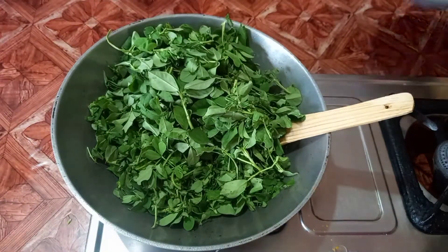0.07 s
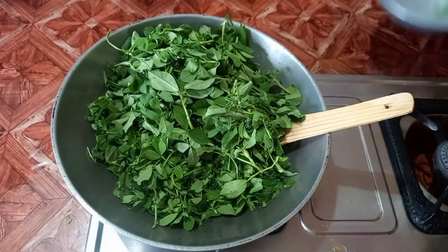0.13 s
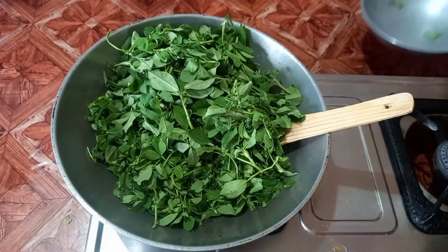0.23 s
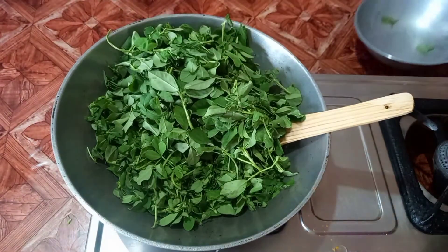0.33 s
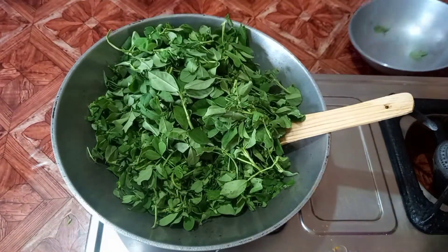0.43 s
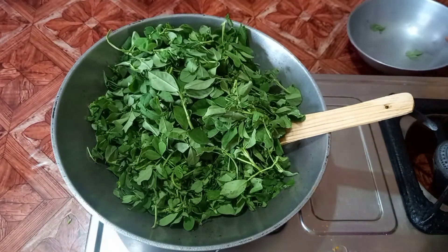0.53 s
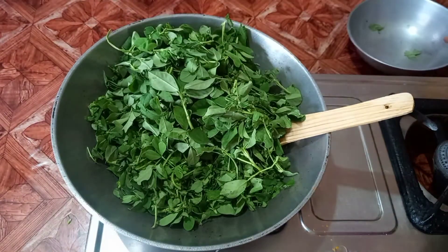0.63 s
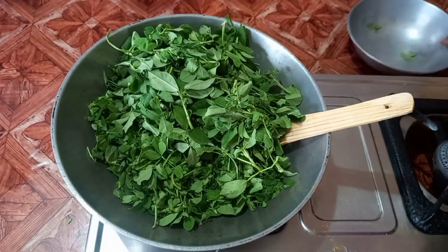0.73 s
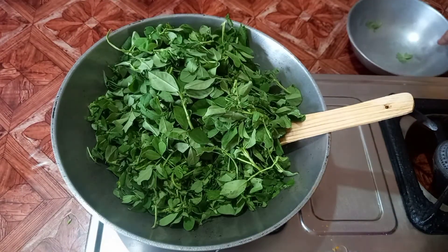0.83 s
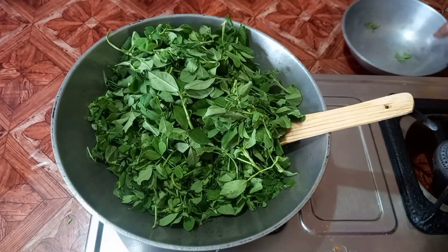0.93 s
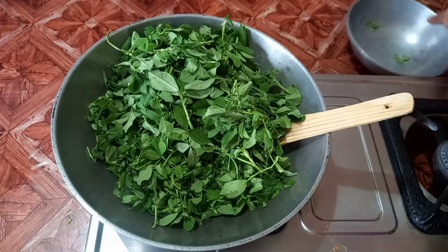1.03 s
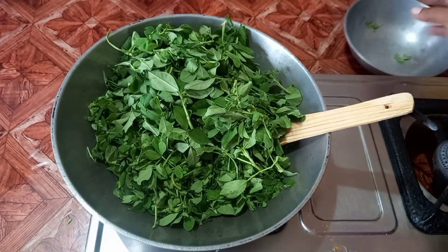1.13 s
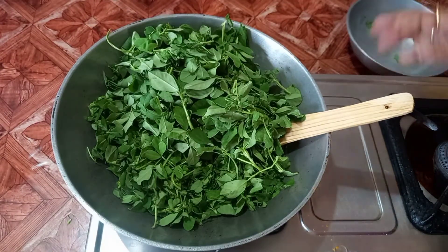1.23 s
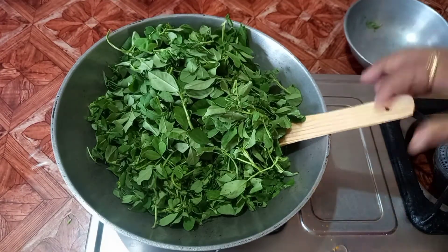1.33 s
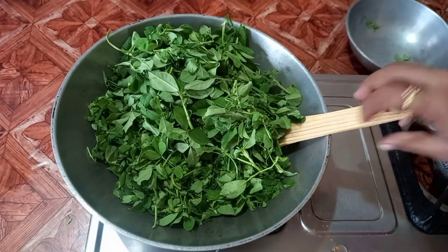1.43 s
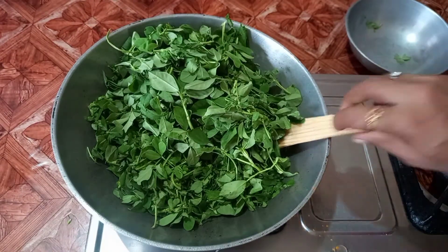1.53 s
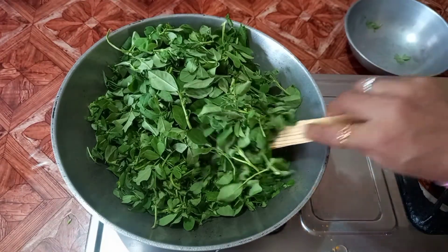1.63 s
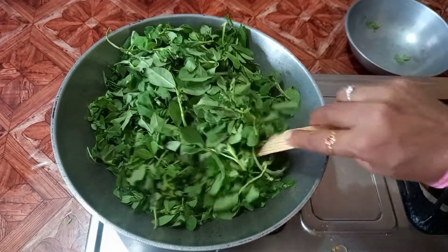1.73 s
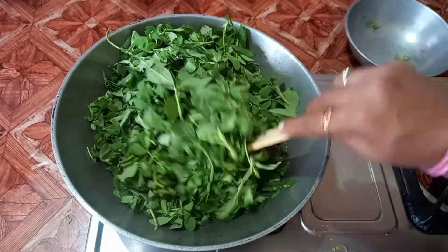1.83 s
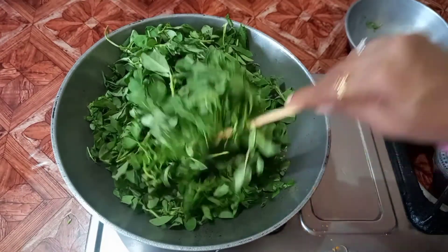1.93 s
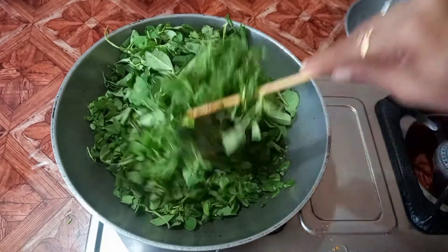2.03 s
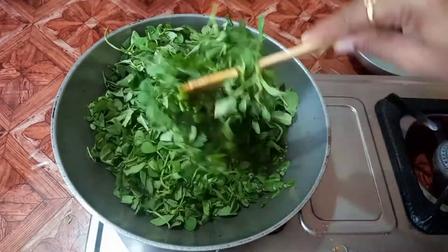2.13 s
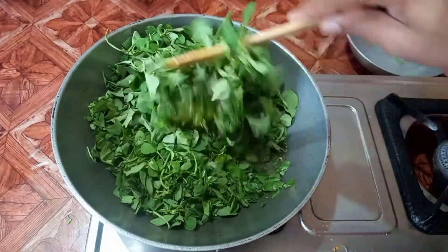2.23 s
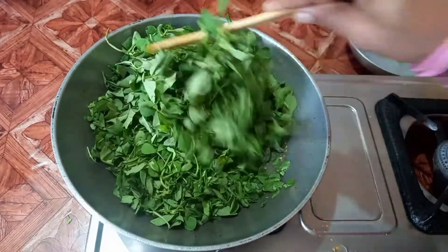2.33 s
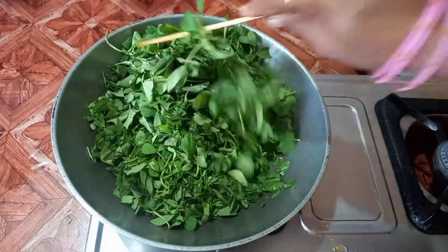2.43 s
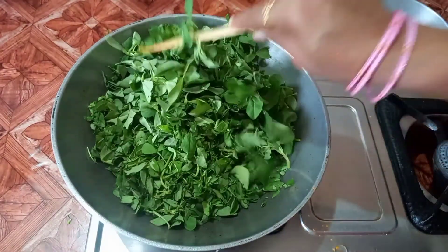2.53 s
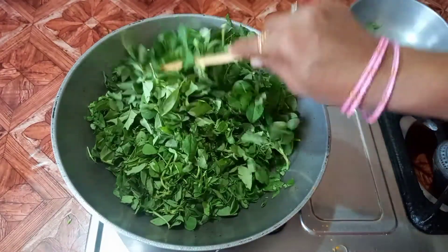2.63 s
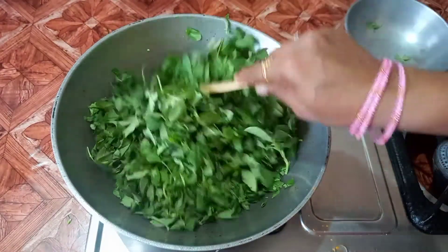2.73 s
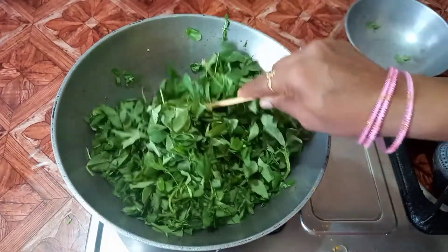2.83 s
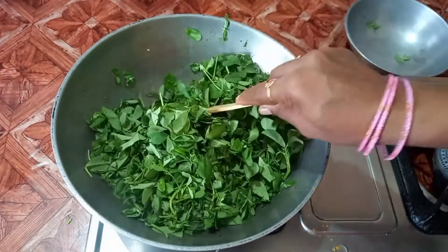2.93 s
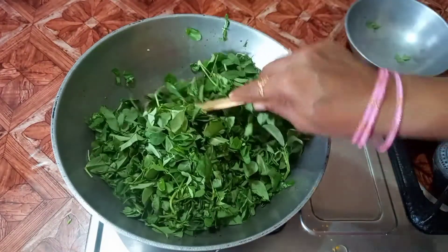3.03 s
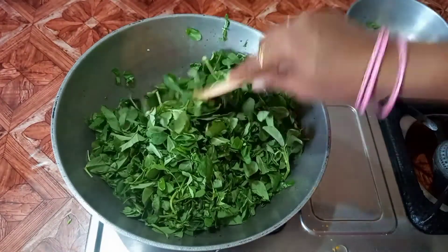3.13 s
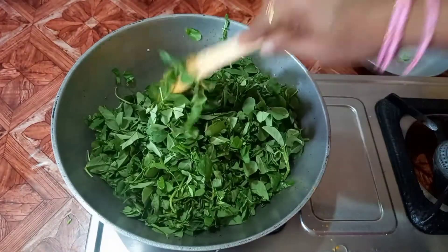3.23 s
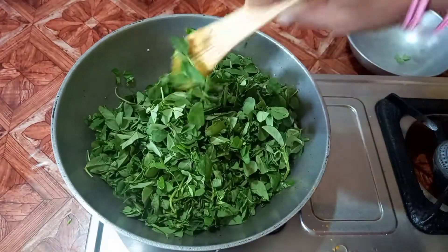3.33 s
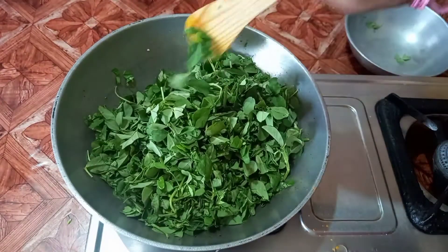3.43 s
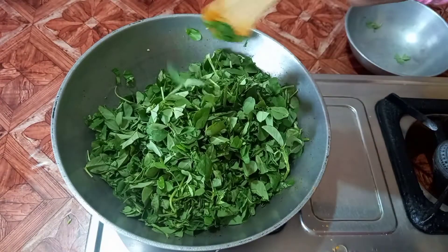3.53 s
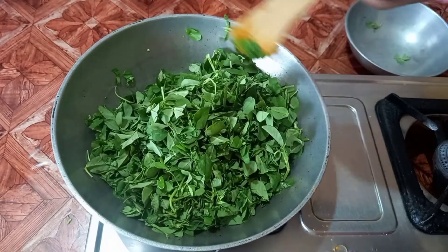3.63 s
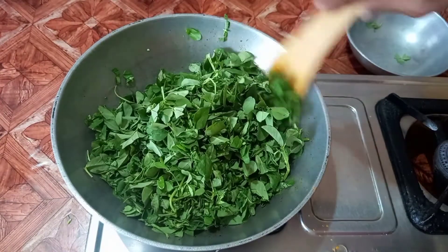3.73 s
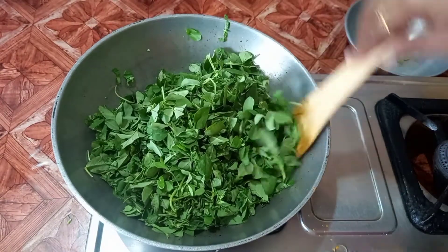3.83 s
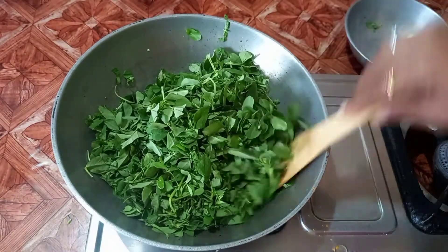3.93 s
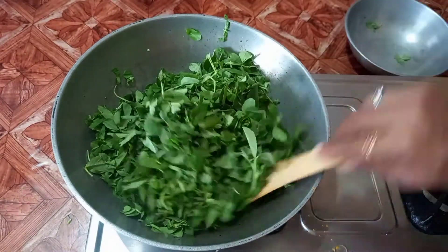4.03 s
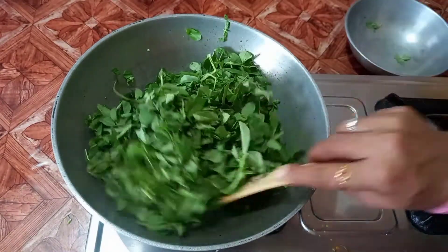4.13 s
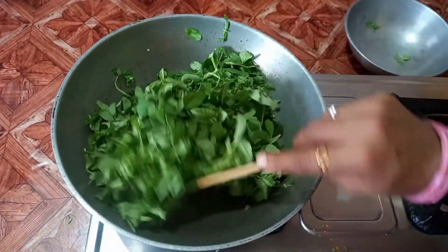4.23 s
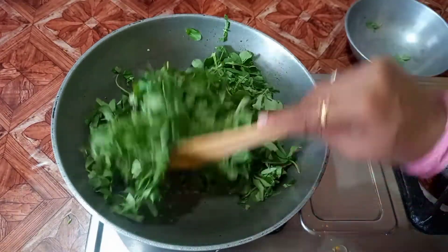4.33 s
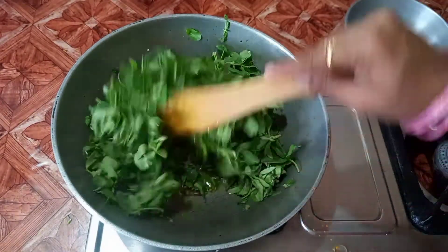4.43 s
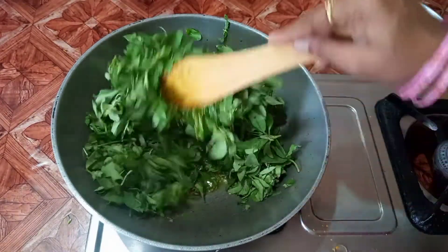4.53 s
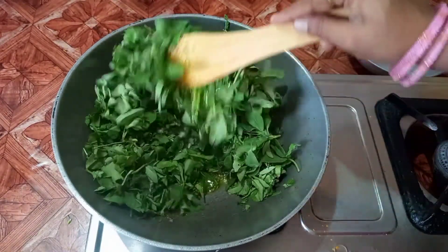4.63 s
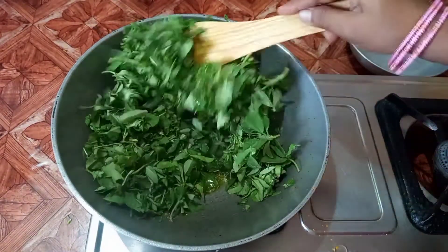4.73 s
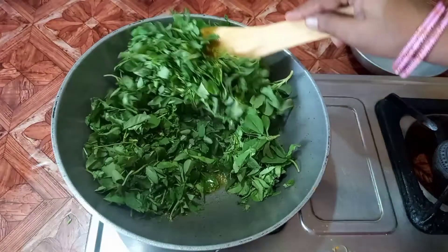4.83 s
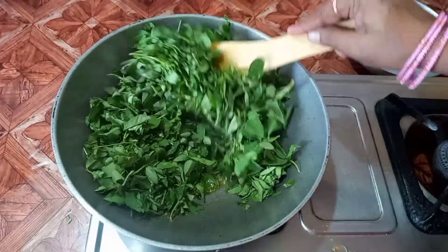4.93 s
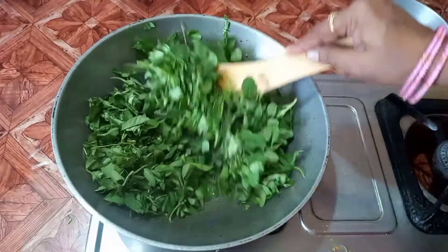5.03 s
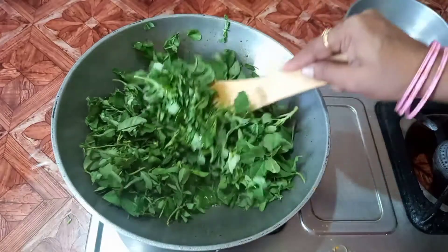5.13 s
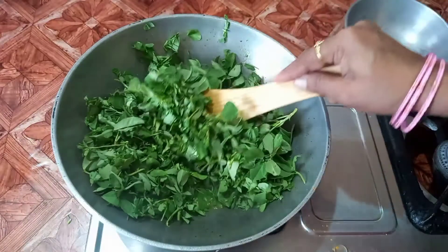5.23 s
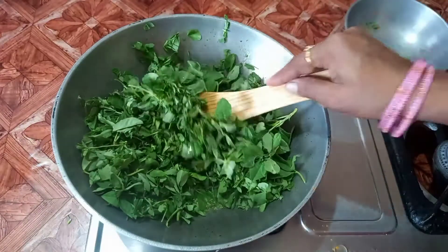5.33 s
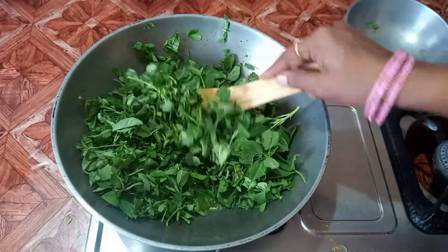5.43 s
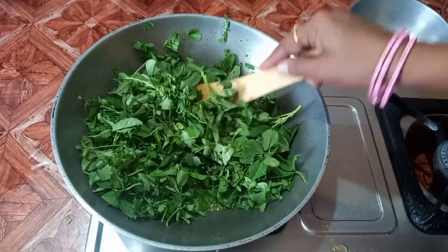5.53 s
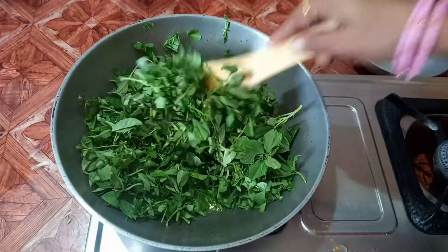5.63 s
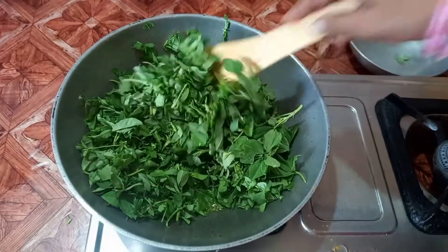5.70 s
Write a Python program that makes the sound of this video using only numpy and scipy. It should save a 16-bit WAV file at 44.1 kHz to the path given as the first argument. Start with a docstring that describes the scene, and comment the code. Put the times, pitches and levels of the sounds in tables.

```python
"""Frying leafy greens

Leafy greens fry in a wide pan in a small kitchen: random bubble bursts and noise, filtered in bands.
A steel bowl is set down on the counter and rattles to rest in several quick touches, and bangles chink:
clicks ring decaying modes. A wooden spatula then turns the leaves, with rustle, pan hum and crackle;
the sizzle swells and deepens, most of all around the strong turns."""
import sys
import numpy as np
from scipy import signal
from scipy.fft import rfft, irfft, next_fast_len
from scipy.io import wavfile

SR = 44100
rng = np.random.default_rng(int(sys.argv[2]) if len(sys.argv) > 2 else 0)


def wav_out(sig):
    """Save sig, one row per channel (or a flat mono array), as 16-bit PCM at SR to the path in sys.argv[1]."""
    wavfile.write(sys.argv[1], SR, np.round(np.clip(np.atleast_2d(sig).T, -1, 1) * 32767).astype(np.int16))


N = 254302


def from_db(db):
    """Gain of a level in dB."""
    return 10 ** (np.asarray(db) / 20)


def rms_one(x):
    """Scale to rms 1."""
    return x / np.sqrt(np.mean(x ** 2) + 1e-20)


def bandpass(x, order, low_hz, high_hz):
    """Butterworth band of x."""
    return signal.sosfilt(signal.butter(order, [low_hz, high_hz], "band", fs=SR, output="sos"), x)


def drift(rate_hz):
    """Slow random curve of spread 1: noise through two equal poles, at SR / 20."""
    pole = np.exp(-40 * np.pi * rate_hz / SR)
    noise = rng.standard_normal(N // 20 + 4002)
    slow = signal.lfilter([1], [1, -2 * pole, pole * pole], noise)[4000:]   # start-up dropped
    return np.interp(np.arange(N) / 20, np.arange(len(slow)), rms_one(slow - slow.mean()))


def ring(clicks, hz, t60_s):
    """Two-pole resonator: a unit click sets a sine of height 1 ringing."""
    r, w = from_db(-60 / (t60_s * SR)), 2 * np.pi * hz / SR
    return signal.lfilter([0, np.sin(w)], [1, -2 * r * np.cos(w), r * r], clicks + 1e-18)


def resonances(sources, modes):
    """Sum of modes, each rung by its own source; bandwidth sets the decay."""
    out = np.zeros(N)
    for source, (hz, width_hz, db) in zip(sources, modes):
        t60_s = np.log(1000) / np.pi / width_hz
        out += from_db(db) * rms_one(ring(source, hz, t60_s))
    return out


def bursts(per_s, spread_db, clump_db):
    """Random clicks of very uneven size, arriving in clumps; rms 1."""
    sizes = from_db(spread_db * np.minimum(rng.exponential(1, N), 5))
    sizes = sizes * rng.choice([-1, 1], N)
    chance = per_s * from_db(clump_db * drift(15)) / SR
    return rms_one(sizes * (rng.random(N) < chance))


def coloured(sources, spectrum, patchy_db):
    """Quarter-octave bands of two sources in turn, each band with its own flicker; rms 1."""
    out = 0
    edges_hz = 25 * 2 ** (np.arange(39) / 4)
    hz, db = np.transpose(spectrum)
    for k, (low, high) in enumerate(zip(edges_hz, edges_hz[1:])):
        centre_hz = np.sqrt(low * high)
        if hz[0] < centre_hz < hz[-1]:
            level_db = np.interp(np.log(centre_hz), np.log(hz), db)
            out = out + bandpass(sources[k % 2], 2, low, high) * from_db(level_db + patchy_db * drift(14.0))
    return rms_one(out)


def strike(touches, modes, vary_db):
    """Each touch strikes every mode with a strength and sign of its own."""
    out = np.zeros(N)
    s, db = np.transpose(touches)
    at = np.round(s * SR).astype(int)
    luck = rng.normal(0, 1, (len(s), len(modes), 2))
    for k, (hz, mode_db, t60_s) in enumerate(modes):
        clicks = np.zeros(N)
        clicks[at] = from_db(db + mode_db + vary_db * luck[:, k, 0]) * np.sign(luck[:, k, 1])
        out += ring(clicks, hz, t60_s)
    return out


def swells(rows, rest_db, fade_db_per_s):
    """Level in dB: each row rises, holds and fades to rest; the loudest row counts."""
    t = np.arange(N) / SR
    levels = []
    for s, rise_s, hold_s, db in rows:
        top_s = s + rise_s
        fade_s = top_s + hold_s
        rest_s = fade_s + abs(db - rest_db) / fade_db_per_s
        levels.append(np.interp(t, [s, top_s, fade_s, rest_s], [rest_db, db, db, rest_db]))
    return np.max(levels, axis=0)


# spectrum of flame and room: pitch_hz, relative_db_per_hz
RUMBLE = [(21, -50), (35, -25), (59, -3.5), (182, -2), (440, -7.5), (476, -27), (523, -4), (775, -7.5),
          (1500, -8), (1950, -49), (3300, -120)]


def rumble():
    """Flame and room: steady noise in flickering bands."""
    return from_db(-72) * coloured(rng.standard_normal((2, N)), RUMBLE, patchy_db=1.0)


KITCHEN_T60_S = 0.52   # at the lowest pitches


def kitchen(x):
    """Eight feedback delays, evaluated by frequency; walls swallow the treble."""
    size = next_fast_len(N + SR)
    hz = np.arange(size // 2 + 1) * SR / size
    t60_s = KITCHEN_T60_S / (1 + hz / 6000)
    echo = 0
    for lag_s in rng.uniform(.008, .03, size=8):
        loop = 10 ** (-3 * lag_s / t60_s) * np.exp(-2j * np.pi * hz * lag_s)
        echo = echo + loop / (1 - loop)
    return irfft(rfft(x, size) * echo, size)[:N]


# short brushing noises by the counter:
# start_s, length_s, loudest_at (share of length), centre_hz, width_hz, level_db
BRUSHES = [(0.849, 0.14, .08, 3300, 1300, -58), (0.97, .13, .46, 2050, 1000, -57),
           (1.208, 0.012, .2, 4500, 4000, -44), (1.208, .13, .12, 2870, 400, -56),
           (1.206, 0.22, .15, 1930, 300, -61), (1.206, 0.13, .15, 5000, 3020, -55.5),
           (1.243, .025, .3, 13300, 4000, -60), (1.598, 0.06, .2, 9500, 6000, -58),
           (1.59, 0.04, .3, 3830, 2000, -63)]


def brushes():
    """Puffs of band noise that swell and fade."""
    out = np.zeros(N)
    for s, length_s, loudest_at, hz, width_hz, db in BRUSHES:
        edges_hz = np.clip([hz - width_hz / 2, hz + width_hz / 2], 50, .45 * SR)
        noise = rms_one(bandpass(rng.standard_normal(SR // 2), 2, *edges_hz))
        age = np.clip(np.arange(len(noise)) / SR / length_s, 0, 1)
        puff = np.sin(np.pi * age ** (np.log(.5) / np.log(loudest_at))) ** 2
        out[round(s * SR):][:len(noise)] += from_db(db) * noise * puff
    return out


# bangles touching: start_s, strength_db
CHINKS = [(0.395, -51), (0.457, -59), (1.218, -54), (1.601, -47)]
# bangle modes: pitch_hz, relative_db, t60_s
BANGLE = [(3850, -7.5, 0.12), (7150, -7, 0.12), (10320, 2, 0.14)]


def bangles():
    """Each chink rings three high modes."""
    return strike(CHINKS, BANGLE, vary_db=5.5)


# bowl touching the counter: start_s, thud_relative_db, tick_relative_db, chatter_relative_db
BOWL_TOUCHES = [(0.5574, -17, -32.5, -34.5), (0.563, -25, -43, -35), (0.582, -24.5, -52, -37.5),
                (0.6, -24.5, -42, -37.5), (0.607, -27.5, -54, -37), (0.631, -30, -48, -38),
                (0.648, -32, -59, -40.5), (0.668, -24, -46, -38), (0.734, -38, -41, -46.5)]
# body modes, before the grip: pitch_hz, relative_db, t60_s
BOWL_BODY = [(166, -9, 0.19), (242.4, -17.5, 0.39), (326, -21.5, 0.16), (355, -14.5, 0.21),
             (398, -12.5, 0.26), (461, -15, .12), (493, -10, 0.14), (544, -10.5, 0.25), (555, -9.5, 0.14),
             (613, -9, 0.22), (637, -9, .15), (672, -4, 0.14), (696.6, -3, 0.2), (735, 2, 0.087),
             (767, -0.5, 0.12), (796, 1, 0.11), (847, -7, 0.15), (863, 2, 0.17), (882, -5.5, 0.25),
             (903, -5.5, 0.17), (945, -7, 0.23), (969, 2, 0.149), (997, -8, 0.12), (1020, -13, 0.12),
             (1040, -1.5, 0.18), (1070, -11, 0.17), (1147, -9.5, 0.21), (1180, -12.5, 0.22),
             (1244, -8, 0.16), (1256, -4, 0.32), (1290, -3, 0.24), (1463, -14, 0.13), (1520, -14, .13)]
# rim modes: pitch_hz, relative_db, t60_s
BOWL_RIM = [(2580, -22, 0.034), (3820, -9, 0.14), (3854, -1.5, 0.045), (4800, -3, 0.026),
            (5760, 2.5, 0.019), (6600, -10, 0.053)]
# dull knocks of the counter under the two hardest landings: start_s, strength_db
KNOCKS = [(0.5575, -34.5), (0.6685, -33)]
# counter modes, before the band filter: pitch_hz, relative_db, t60_s
COUNTER = [(333, -6, 0.047), (554, -2.5, 0.034), (780, -1, 0.041), (1035, -6, 0.026), (1300, -3.5, .03),
           (1600, -18, .02)]
CHATTER_FADE_DB_PER_S = 142   # after each touch the base chatters and dies away
SETTLED_S, GRIP_DB_PER_S = 0.67, 75   # from here the body loses its ring faster


def bowl():
    """Thuds and chatter ring the body, ticks ring the rim; the counter knocks and damps the body."""
    touches, t = np.array(BOWL_TOUCHES), np.arange(N) / SR
    rattle = np.max([(t > s) * from_db(db - CHATTER_FADE_DB_PER_S * np.maximum(t - s, 0))
                     for s, db in touches[:, [0, 3]]], axis=0)
    chatter = rattle * bursts(per_s=2800, spread_db=3.0, clump_db=3.0)

    body = from_db(-15) * strike(touches[:, [0, 1]], BOWL_BODY, vary_db=1.5)
    for k, (hz, db, t60_s) in enumerate(BOWL_BODY):
        shifted = np.roll(chatter, 37 * k)   # modes out of step
        body += from_db(-38.5 + db) / t60_s ** .5 * ring(shifted, hz, t60_s)
    body *= from_db(-GRIP_DB_PER_S * np.maximum(t - SETTLED_S, 0))
    body += strike(KNOCKS, COUNTER, vary_db=3.0)
    body = bandpass(body, 4, 260, 1350)   # a soft base, a small radiator

    scratch = bandpass(chatter, 2, 1800, 6500)
    ticks = strike(touches[:, [0, 2]], BOWL_RIM, vary_db=1.5)
    return body + from_db(-7.0) * scratch + from_db(-5.0) * ticks


# spatula dragging on the pan: start_s, rise_s, hold_s, hum_relative_db
DRAGS = [(3.0, 0.054, 0.11, -78), (4.18, 0.11, 0.076, -74.5), (4.62, 0.055, 0.063, -77),
         (4.95, 0.14, 0.42, -71), (5.5, .05, 0.093, -75)]
# low pan modes: pitch_hz, width_hz, relative_db
PAN = [(1160, 36, 2.5), (1550, 45, -2), (1780, 50, -12)]
DRAG_REST_DB, DRAG_FADE_DB_PER_S = -87, 200


def dragging():
    """Friction noise rings the low modes of the pan."""
    rub = rng.standard_normal((len(PAN), N))
    return from_db(swells(DRAGS, DRAG_REST_DB, DRAG_FADE_DB_PER_S)) * resonances(rub, PAN)


# wet leaves pressed on the hot metal: start_s, rise_s, hold_s, crackle_relative_db
CRUNCHES = [(2.895, .025, .015, -55), (3.12, .05, .02, -57), (3.26, .02, .03, -54), (3.39, .04, .03, -55),
            (4.62, .05, .04, -58), (5.12, .015, .05, -58), (5.23, .025, .18, -54), (5.5, .04, .05, -57)]
# bright pan modes: pitch_hz, width_hz, relative_db
CRUNCH_RING = [(2780, 250, -5), (3720, 200, 0), (4400, 400, -4)]
CRUNCH_REST_DB, CRUNCH_FADE_DB_PER_S = -79, 203


def crunching():
    """Dense clicks ring the bright modes of the pan."""
    clicks = bursts(per_s=3000, spread_db=3.0, clump_db=1.0)
    shifted = [np.roll(clicks, 9 * k) for k in range(len(CRUNCH_RING))]
    highpass = signal.butter(4, 2300, "high", fs=SR, output="sos")
    crackle = signal.sosfilt(highpass, resonances(shifted, CRUNCH_RING))
    return from_db(swells(CRUNCHES, CRUNCH_REST_DB, CRUNCH_FADE_DB_PER_S)) * crackle


# vigour of the frying: time_s, sizzle_db, sputter_db
FRY = [(0.0, -57.5, -75), (0.36, -58, -75), (0.7, -57, -73), (1.18, -56.5, -65.5), (1.63, -56, -74),
       (1.88, -55.5, -67), (2.2, -53, -74), (2.72, -54, -70), (2.775, -50, -64), (2.98, -50.5, -63),
       (3.17, -50.5, -57), (3.32, -51.5, -62), (3.47, -51.5, -62), (3.6, -52, -62.5), (3.78, -53, -60.5),
       (3.93, -52.5, -65.5), (4.16, -52.5, -63.5), (4.35, -53, -63), (4.53, -51, -60.5), (4.72, -51.5, -63),
       (5.01, -51.5, -62), (5.3, -48.5, -56), (5.46, -48, -57.5), (5.64, -50.5, -58.5), (5.77, -50.5, -63)]


def controls():
    """Sizzle and sputter levels in dB, sample by sample."""
    s, *levels = np.transpose(FRY)
    return [np.interp(np.arange(N) / SR, s, db) for db in levels]


# sharp clicks, mostly drops bursting in the oil, some of bangles and counter: start_s, peak_db, pitch_hz
POPS = [(0.8209, -44, 6270), (0.8541, -38, 3060), (0.9545, -43, 3790), (1.1833, -41, 4480),
        (1.2105, -35, 2900), (1.2115, -31, 6460), (1.2147, -41, 3640), (1.2456, -40, 3100),
        (1.3234, -41, 3920), (1.3453, -44, 6220), (1.3606, -44, 4950), (1.4436, -38, 4670),
        (1.4973, -41, 4630), (1.5515, -44, 5860), (1.5575, -43, 6800), (1.602, -43, 3940),
        (1.605, -43, 6480), (1.7365, -44, 5730), (1.7732, -34, 3140), (1.8176, -42, 3100),
        (1.8568, -42, 5300), (2.0234, -41, 5620), (2.0392, -41, 3120), (2.0513, -40, 3210),
        (2.0761, -40, 4870), (2.1934, -38, 4970), (2.2077, -36, 5920), (2.3313, -41, 5300),
        (2.338, -41, 4110), (2.4542, -41, 3940), (2.5286, -42, 3450), (2.5462, -41, 4010),
        (2.5548, -39, 3850), (2.6023, -41, 3770), (2.7458, -34, 3700), (2.7484, -28, 4600),
        (2.756, -38, 4500), (2.7604, -38, 3620), (2.7696, -37, 4760), (2.7843, -36, 3900),
        (2.7908, -37, 4000), (2.8675, -34, 3010), (2.9105, -36, 4650), (2.9234, -37, 4370),
        (2.9623, -37, 4220), (3.182, -38, 3600), (3.277, -37, 4460), (3.2963, -38, 4570),
        (3.3107, -38, 4260), (3.4085, -37, 3040), (3.45, -37, 3600), (3.506, -39, 4840),
        (3.8952, -40, 3210), (4.0033, -39, 3080), (4.0213, -37, 3790), (4.2651, -39, 2990),
        (4.2899, -39, 4220), (4.3347, -40, 2860), (4.348, -38, 3140), (4.3512, -40, 3290),
        (4.4122, -40, 4740), (4.6734, -34, 3960), (4.7482, -38, 4440), (4.9039, -37, 3980),
        (5.0112, -39, 4010), (5.2486, -36, 4800), (5.2511, -33, 3660), (5.3012, -34, 3700),
        (5.3495, -34, 3710), (5.4005, -34, 3750), (5.4202, -35, 3320), (5.5131, -34, 5790),
        (5.6784, -37, 3790)]
# lesser drops at random; their level is relative to the sizzle
SMALL_POPS_PER_S, SMALL_POP_DB, SMALL_POP_SPREAD_DB = 16, 5.5, 2.5
SMALL_POP_LOW_HZ, SMALL_POP_HIGH_HZ = 2730, 5600


def pops():
    """Sharp clicks, mostly bursting drops: a broad snap and a few cycles at the click's own pitch."""
    at = np.flatnonzero(rng.random(N) < SMALL_POPS_PER_S / SR)
    size_luck, pitch_luck = rng.random((2, len(at)))
    sizzle_db = controls()[0][at]
    small_db = sizzle_db + SMALL_POP_DB - SMALL_POP_SPREAD_DB * np.log(size_luck + 0.055)
    small_hz = SMALL_POP_LOW_HZ * (SMALL_POP_HIGH_HZ / SMALL_POP_LOW_HZ) ** pitch_luck
    clicks = [*POPS, *zip(at / SR, small_db, small_hz)]

    t = np.arange(400) / SR
    out = np.zeros(N + len(t))
    for s, db, hz in clicks:
        tone = 0.5 * np.sin(2 * np.pi * hz * t) * np.exp(-t * hz / 2.8)
        snap = (rng.standard_normal(len(t)) + 4 * (t == 0)) * np.exp(-t / .0004)
        grain = bandpass(tone + snap, 3, 2400, 8000)
        out[round(s * SR):][:len(t)] += from_db(db) * grain / np.abs(signal.hilbert(grain)).max()
    return out[:N]


# frying spectra: pitch_hz, relative_db_per_hz
SIZZLE = [(1900, -36), (2300, -17), (2800, -3.5), (3700, -0.5), (5000, 0), (6500, -1.5), (8000, -7),
          (9500, -3), (11000, -13), (12500, -29)]
SPUTTER = [(900, -46), (1300, -19.5), (1700, -4.5), (2200, 0), (2800, 1.5), (3300, -3), (3700, -4),
           (4300, -16), (5000, -27)]
HISS = [(10000, -15), (11800, 0), (13500, -0.5), (15500, -4), (19500, -6)]
RUSTLE = [(250, -41), (450, -4.5), (800, -2), (1150, 2.5), (1500, 1.5), (2000, 5.5)]
# leaves rustling as the spatula turns them: start_s, rise_s, hold_s, level_db
STIRS = [(2.72, 0.04, 0.26, -65), (2.9, 0.19, 0.069, -64), (3.6, 0.07, 0.073, -73), (4.15, 0.1, 0.067, -77),
         (4.75, 0.25, 0.14, -67), (5.0, 0.37, 0.081, -61.5)]
RUSTLE_REST_DB, RUSTLE_FADE_DB_PER_S = -77.5, 31
HISS_BELOW_SIZZLE_DB = 15


def frying():
    """Steam bubbles burst: fine ones sizzle and hiss, larger ones sputter; turned leaves rustle."""
    sizzle_db, sputter_db = controls()
    hiss_db = sizzle_db - HISS_BELOW_SIZZLE_DB
    sputter_db = sputter_db + 1.8 * drift(6.5)
    rustle_db = swells(STIRS, RUSTLE_REST_DB, RUSTLE_FADE_DB_PER_S) + 1.2 * drift(15)

    fine = bursts(per_s=5000, spread_db=7.0, clump_db=2.0)
    coarse = bursts(per_s=1500, spread_db=2.0, clump_db=3.0)
    blur = 0.95 * rng.standard_normal((2, N))   # bubbles too many to tell apart

    sizzle = from_db(sizzle_db) * coloured(fine + blur, SIZZLE, patchy_db=0.88)
    sputter = from_db(sputter_db) * coloured(0.053 * fine + coarse + blur, SPUTTER, patchy_db=1.2)
    hiss = from_db(hiss_db) * coloured(0.9 * fine + blur, HISS, patchy_db=0.8)
    rustle = from_db(rustle_db) * coloured(0.2 * coarse + blur, RUSTLE, patchy_db=1.3)
    return sizzle + sputter + hiss + rustle


def lean_left(x, low_hz, high_hz, side_db):
    """A band of x added on the left and taken from the right."""
    return from_db(side_db) * bandpass(x, 3, low_hz, high_hz) * [[1], [-1]]


def scene():
    """All sources reach the microphone from nearly one spot ahead."""
    hits = bangles() + bowl() + pops()
    hits = hits + from_db(-21.5) * kitchen(hits)
    pan = rumble() + dragging() + crunching() + frying()
    side = lean_left(hits, 220, 236, side_db=-6) + lean_left(pan, 690, 1270, side_db=-23)
    return hits + pan + brushes() + side


APART_HZ = (9410, 11040)   # here the channels are partly of opposite polarity
CUTOFF_HZ = 15900


def record(dry):
    """In one treble band the phase lags on the left and leads on the right; the top is cut."""
    band = signal.sosfiltfilt(signal.butter(3, APART_HZ, "band", fs=SR, output="sos"), dry)
    quadrature = signal.hilbert(band, next_fast_len(N))[:, :N].imag
    turn_rad = 1.17 + 0.43 * drift(14.0)
    wide = dry + band * (np.cos(turn_rad) - 1) + quadrature * np.sin(turn_rad) * [[1], [-1]]
    return signal.sosfilt(signal.ellip(12, .5, 70, CUTOFF_HZ, fs=SR, output="sos"), wide)


dry = scene()
out = record(dry)
wav_out(out)
```